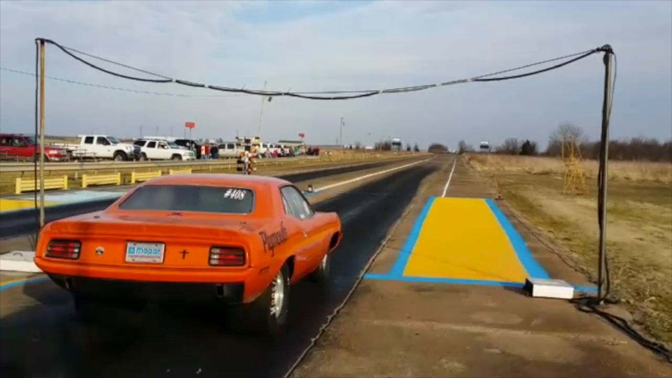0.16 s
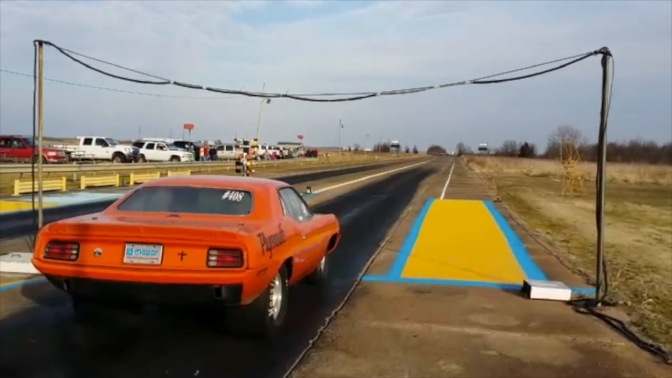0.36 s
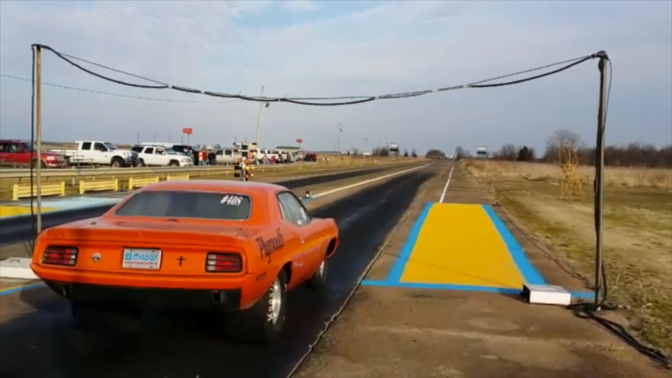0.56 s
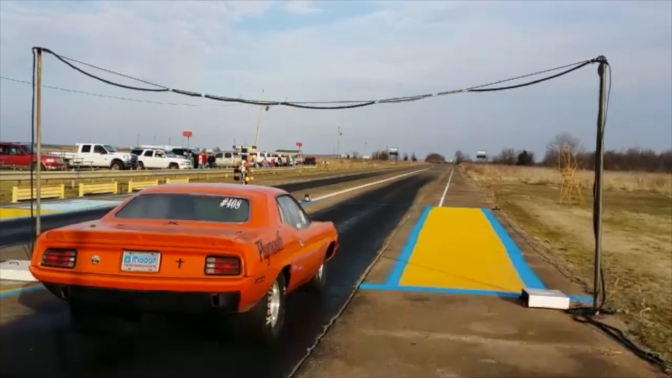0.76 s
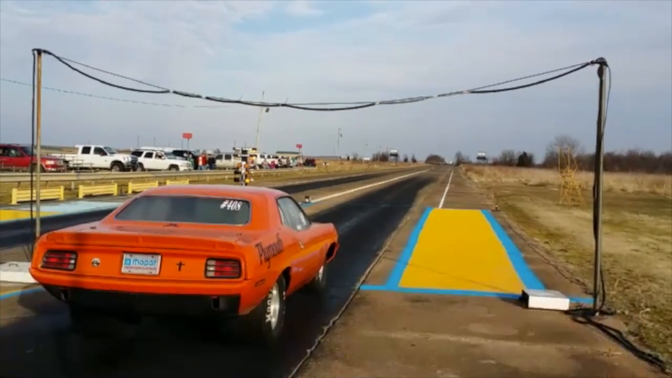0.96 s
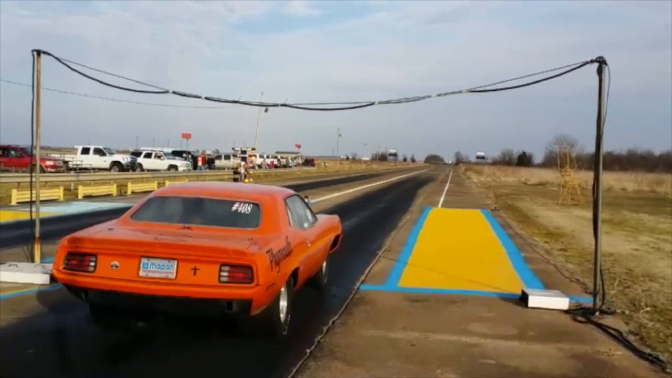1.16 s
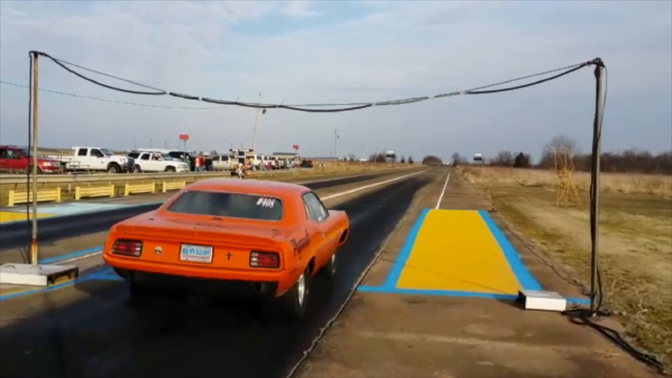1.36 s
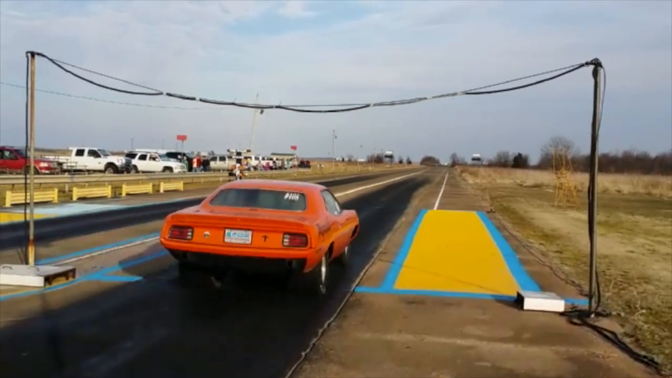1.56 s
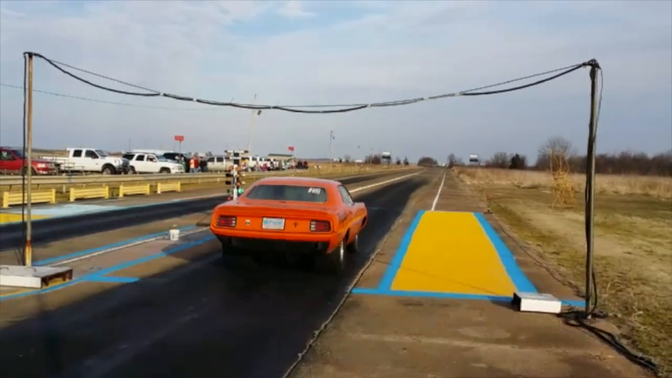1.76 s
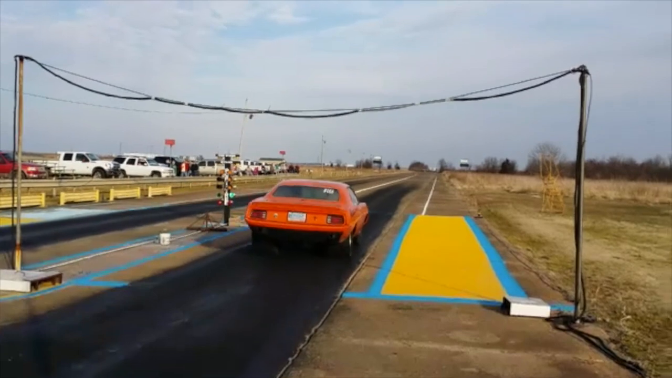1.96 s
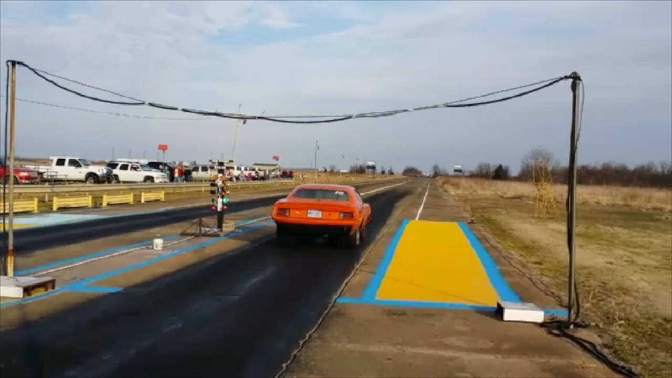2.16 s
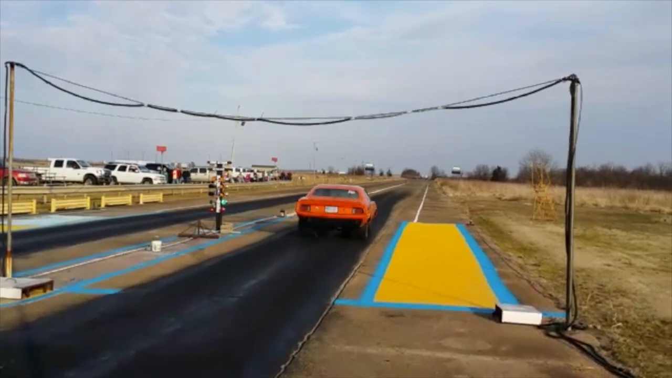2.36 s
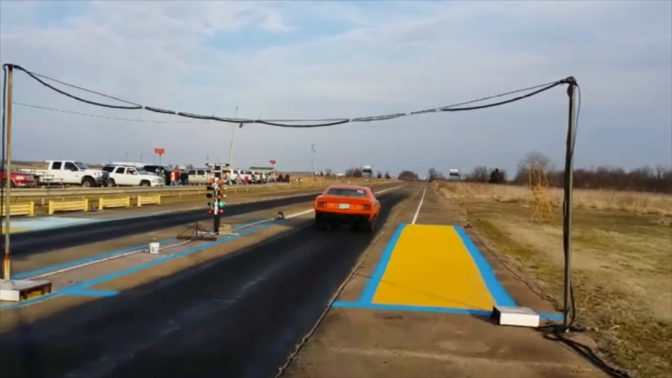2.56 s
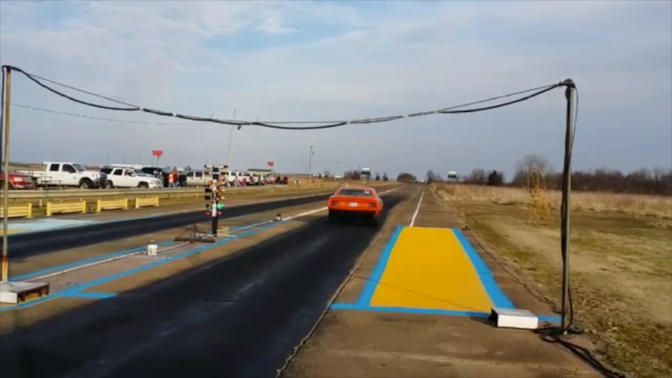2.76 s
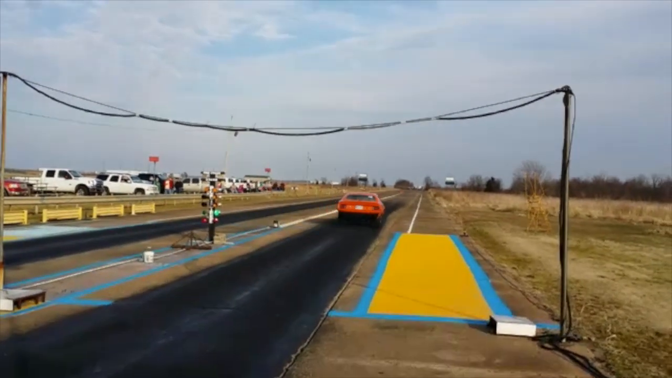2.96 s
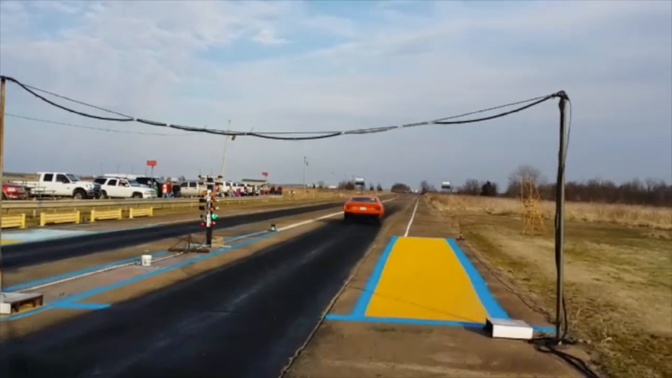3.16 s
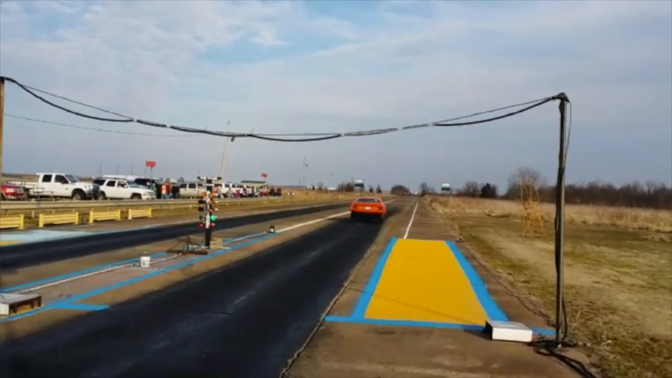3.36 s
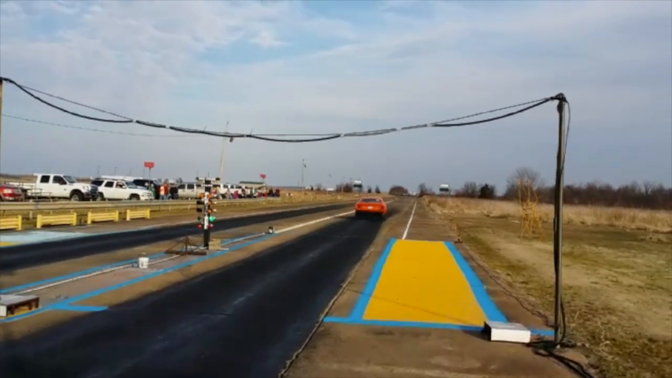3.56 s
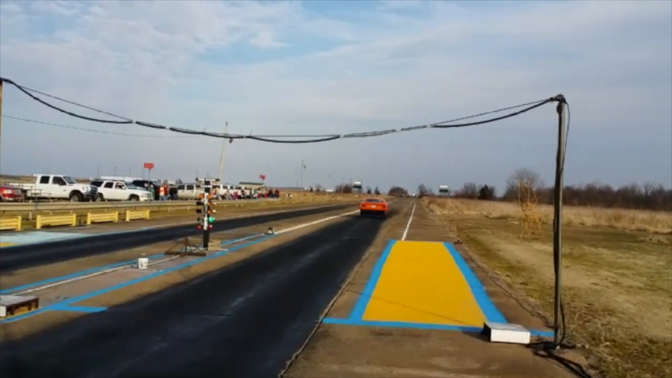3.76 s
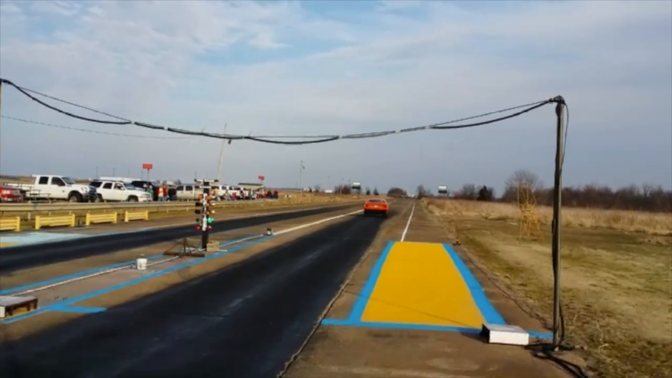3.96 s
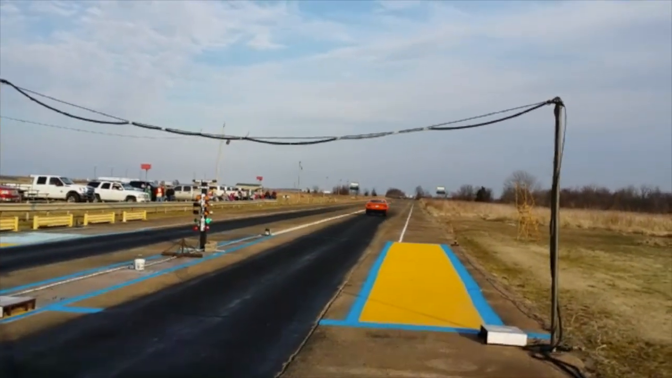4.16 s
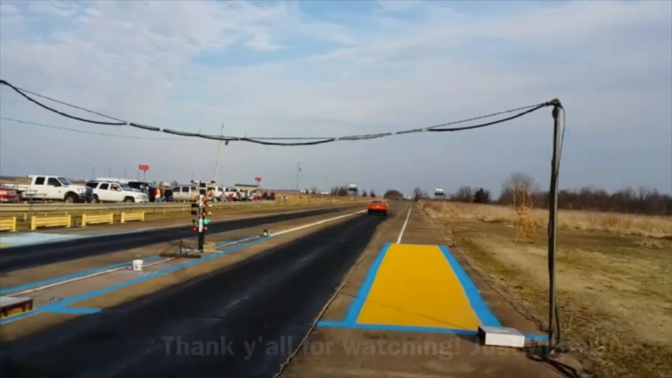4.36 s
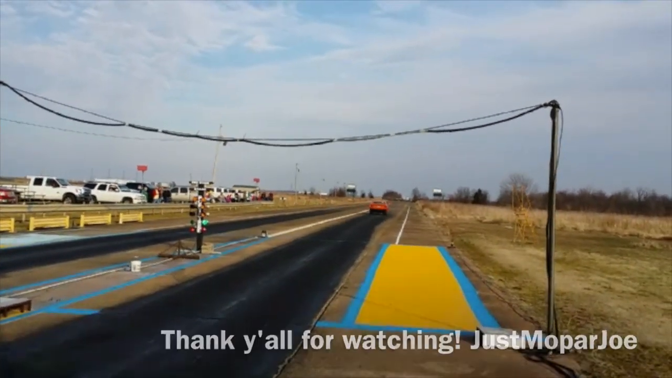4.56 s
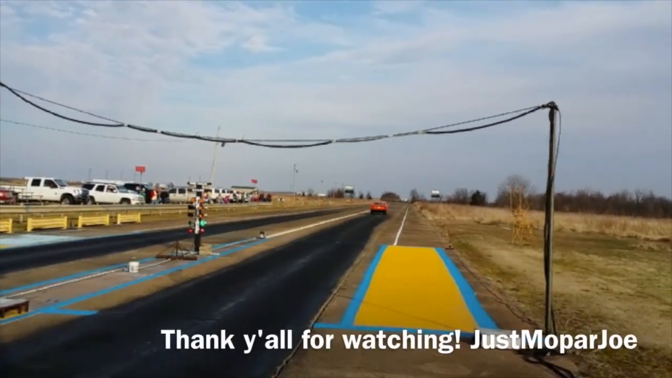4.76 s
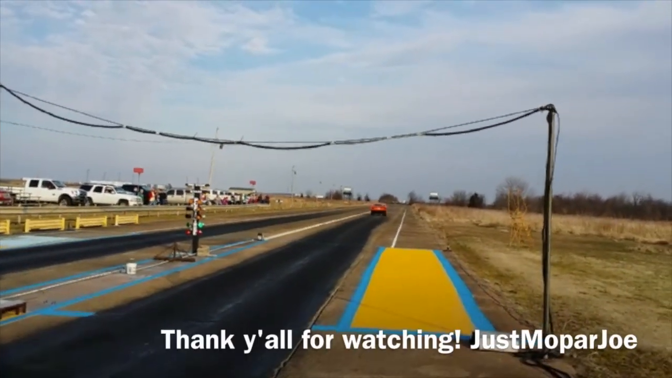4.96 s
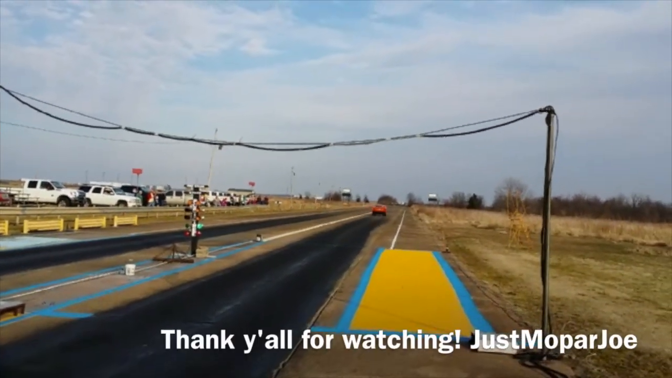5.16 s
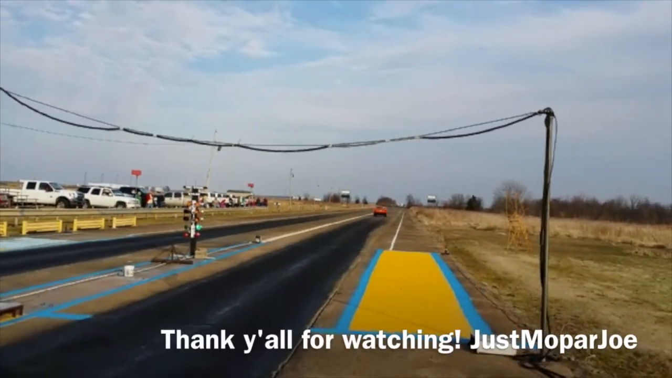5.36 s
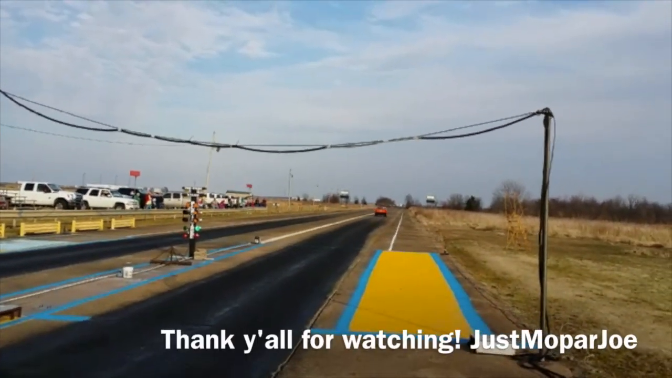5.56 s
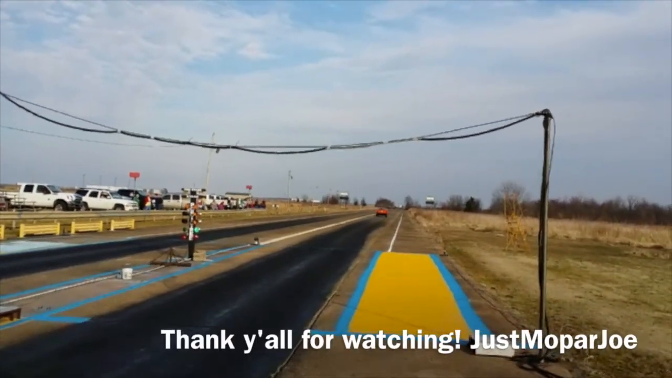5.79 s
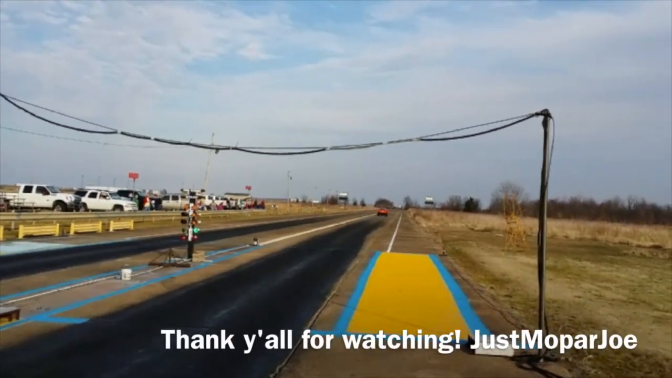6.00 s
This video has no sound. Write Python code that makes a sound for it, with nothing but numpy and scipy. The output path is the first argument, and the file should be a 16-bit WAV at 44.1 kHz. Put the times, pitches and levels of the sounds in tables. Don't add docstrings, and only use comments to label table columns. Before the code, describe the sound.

Loud open-pipe engine machine-guns at held revs, launches, climbs in pitch, drops with a shift, and drones off down the strip.

```python
import sys
import numpy as np
from scipy import signal
from scipy.io import wavfile
from scipy.ndimage import uniform_filter1d

SR = 44100
rng = np.random.default_rng(int(sys.argv[2]) if len(sys.argv) > 2 else 0)


def convert_level_to_amplitude(level_db):
    exponent = np.asarray(level_db, float) / 20
    return 10 ** exponent


def master_out(mix):
    frames = np.transpose(np.atleast_2d(mix))
    ceiling = np.clip(frames, -1, 1)
    pcm = np.round(ceiling * 32767).astype(np.int16)
    wavfile.write(sys.argv[1], SR, pcm)


N = 265923

# [t/s, cam cycles/Hz]
CAM_SPEED = [(0, 24.7), (.84, 24.7), (0.9, 26.1), (1.06, 30.9), (1.1, 32.2), (1.14, 33.4), (1.2, 34.6),
             (1.27, 34.8), (1.36, 34.3), (1.51, 34.1), (1.6, 33.5), (1.61, 33.6), (1.86, 38.1),
             (1.93, 38.2), (2.03, 37.3), (2.06, 37.5), (2.2, 39.3), (2.27, 40.0), (2.43, 41.1),
             (3.04, 44.4), (3.17, 45.5), (3.34, 46.6), (3.47, 47.3), (3.5, 46.2), (3.56, 42.9),
             (3.59, 41.5), (3.63, 40.2), (3.7, 38.8), (3.79, 38.7), (4.0, 38.8), (4.67, 39.6), (4.77, 39.8),
             (5.87, 41.2), (6.03, 41.1)]
# [t/s, exhaust note/dB, roar/dB, hiss/dB, roughness/0-1, odd orders of the near bank/dB]
ENGINE_LOAD = [(0.88, -21.5, -22, -37.5, 0.25, 1), (0.89, -26, -22, -41, 0.3, 6),
               (0.91, -23.5, -22, -32, 0.4, 0), (0.92, -24, -23, -33.5, 0.36, 1),
               (1.2, -28, -19, -30, 0.25, 5), (1.44, -20, -23.5, -32, 0.37, -4.5),
               (1.52, -29, -18.5, -29.5, 0.3, 5), (1.57, -20.5, -23, -31, 0.36, -1.5),
               (1.83, -21.5, -22.5, -32.5, 0.36, 0.5), (1.98, -23.5, -26, -32.5, 0.33, -3.5),
               (2.07, -24.5, -23.5, -34, 0, 6), (2.1, -20, -24.5, -30.5, 0.37, -2),
               (2.3, -22.5, -25, -36.5, 0.12, 0), (2.46, -23.5, -27.5, -34.5, 0.3, 1.5),
               (2.77, -23.5, -27.5, -36, 0.28, 2), (2.9, -22, -30.5, -39.5, 0.25, -1),
               (2.92, -23, -35, -40, 0.37, 2.5), (2.97, -25.5, -29.5, -36, 0.25, 6.5),
               (3.19, -21.5, -29.5, -39.5, 0.3, -4.5), (3.26, -25, -29, -40, 0.1, -6.5),
               (3.32, -24, -29.5, -32.5, 0.25, -0.5), (3.46, -23, -33, -39, 0.18, -4),
               (3.92, -27.5, -29.5, -37.5, 0.15, 3.5), (3.96, -25.5, -31, -43.5, 0.1, -1.5),
               (3.99, -27.5, -33, -37.5, 0.18, 4), (4.08, -26, -29.5, -39.5, 0.25, 0.5),
               (4.31, -25.5, -32.5, -40, 0.1, 2), (4.37, -27.5, -34, -41.5, 0.22, 2.5),
               (4.85, -27.5, -32, -44.5, 0.1, 2), (5.1, -27.5, -33, -42, 0.22, 3),
               (5.27, -27, -25, -45.5, 0.16, -1), (5.53, -28, -31.5, -42.5, 0.19, 4.5),
               (6.03, -27, -34.5, -46.5, 0.2, -1)]
# [order/cam cycles, level/dB]
HELD_ORDERS = [(2, -26), (3, -20), (4, -18), (5, -9), (6, -12), (7, -5), (8, 2), (9, -4), (10, -9), (11, 0),
               (12, -11), (13, -16), (14, -14)]
LEAVING_ORDERS = [(1, -42), (2, -29), (3, -24.5), (4, -32), (5, -5.5), (6, -11.5), (7, -7.5), (8, 2.5),
                  (9, -3), (10, -8), (11, -28), (12, -29), (13, -14), (14, -20.5), (15, -10), (16, -14),
                  (17, -29), (18, -12), (19, -7.5), (20, -13), (21, -19.5), (22, -22), (23, -9),
                  (24, -28.5), (25, -5), (26, -24.5)]
PULLING_ORDERS = [(1, -40), (2, -10), (3, -13.5), (4, -12.5), (5, -1), (6, 2), (7, -5), (8, 0.5),
                  (9, -12.5), (10, -13.5), (11, -24), (12, -10), (13, -13.5), (14, -7), (15, -5), (16, 0.5),
                  (17, -7.5), (18, -12.5), (19, -20.5), (20, -13.5), (21, -24.5), (22, -27), (23, -19.5),
                  (24, -18.5), (25, -31), (26, -22.5), (27, -19), (28, -16.5), (29, -23), (30, -25.5)]
FAR_ORDERS = [(1, -26.5), (2, -14.5), (3, -17.5), (4, -13), (5, -7), (6, 1), (7, -3), (8, 1), (9, -23.5),
              (10, -14.5), (11, -18), (12, -15.5), (13, -10.5), (14, -19), (15, -7), (16, -2.5), (17, -9.5),
              (18, -7), (19, -17), (20, -11), (21, -15.5), (22, -14.5), (23, -11), (24, -24), (25, -23.5),
              (26, -17), (27, -14), (28, -11), (29, -18.5), (30, -9), (31, -10.5), (32, -19.5)]
STAGE_TIMES = [
    .9,
    1.15,
    1.58,
    1.8,
    3.5,
    3.9,
]
STAGE_SPEEDS = [24.7, 34.3, 34.3, 43, 43, 40]
# [f/Hz, width/Hz, level/dB]
PIPE_RESONANCES = [(251, 120, 9.5), (658, 160, 11), (1269, 190, 13.5)]
# [t/s, peak level/dB (not used), depth of cut/dB, length of cut/s]
RELIGHTS = [(0.037, -18, 5.5, 0.053), (0.14, -32, 8, 0.029), (0.208, -3, 13, 0.019), (0.26, -15, 11, 0.012),
            (0.344, -15, 7.5, 0.011), (0.377, -5, 3.5, 0.029), (0.499, -18, 6.5, 0.066),
            (0.566, -20, 5, 0.045), (0.667, -14, 8.5, 0.039), (0.743, -2, 11, 0.02),
            (0.816, -16, 8.5, 0.065), (0.88, -12, 9, 0.018)]
# [t/s, peak level/dB, f/Hz]
AFTERFIRES = [(0.109, -14, 730), (0.298, -14, 721), (0.324, -10.5, 787), (0.379, -15, 874),
              (0.433, -13.5, 720), (0.5, -15, 830), (0.531, -12, 704), (0.652, -17.5, 710),
              (0.678, -18.5, 890), (0.743, -10, 800), (0.825, -10.5, 850), (0.855, -12.5, 678)]
# [t/s, gain/dB, length/s]
TREBLE_MOMENTS = [(0.186, 3.5, .02), (0.392, 9.5, 0.02), (0.576, 8.5, 0.031), (0.672, 6, 0.026),
                  (.97, 3, 0.015), (1.076, -2.5, 0.018), (1.223, 2.5, 0.015), (1.992, 8, 0.016),
                  (2.344, 2.5, 0.014), (2.708, 3.5, .02), (2.85, 6, 0.042), (3.318, 0, 0.021),
                  (4.004, 4, 0.014), (4.275, 2, .04)]
# [f/Hz, level/dB per Hz]
ROAR_NEAR = [(24, -56), (40, -36.5), (155, -8), (215, -13), (267, -15), (376, -23), (467, -12.5),
             (847, -13), (1090, -15), (2050, -18), (2600, -32.5), (3000, -25), (3900, -48), (6600, -120)]
ROAR_FAR = [(24, -48), (40, -56), (118, -18), (227, -1.5), (319, -9), (369, -8), (549, -22), (634, -2.5),
            (979, -16.5), (1090, -6), (1480, -15.5), (1880, -1), (3000, -43), (3900, -57), (6600, -120)]
# [f/Hz, level/dB per Hz]
LEFT_PORT = [(1500, -24.5), (2400, -1), (3000, -10), (3900, -9), (5000, -6.5), (6400, 0.5), (7100, -4.5),
             (7700, -22.5), (11000, -16.5), (13000, -12), (15000, -15.5)]
RIGHT_PORT = [(1500, -24), (2400, -11.5), (3300, -14), (4900, -5.5), (5900, -24), (6700, -10.5),
              (7800, -0.5), (8500, -9), (9200, -11.5), (13000, -9), (15000, -17.5)]
# [f/Hz, likeness/0-1]
PORT_LIKENESS = [(60, 1), (130, 0.37), (290, 0.99), (630, 0.48), (1380, 0.31), (3000, .14), (6600, 0.09)]
# [f/Hz, level/dB]
PORT_LEAN = [(60, 0), (800, -0.4), (1300, 0.5), (2500, 1.5)]
# [t/s, step against treble level/dB]
GRAIN_OVER_TIME = [(0, 7), (.7, 5.5), (.9, 8), (2.5, 9), (2.9, 4), (4.2, 3), (4.6, 6.5), (5.4, 6.5),
                   (6.03, 7.5)]
# [f/Hz, step/dB]
GRAIN_BY_PITCH = [(1500, -16.5), (2300, -2.5), (4000, 4), (6000, -0.5), (7200, -2.5), (8200, -2.5),
                  (8800, 2.5), (9500, 12.5), (15000, 10)]


def evened(x):
    return x / np.sqrt(np.mean(abs(x) ** 2) + 1e-20)


def read(points, hz):
    f, value = np.transpose(points)
    return np.interp(np.log(hz + 1), np.log(f + 1), value)


def curve(rows, t, column=1):
    rows = np.array(rows)
    return np.interp(t, rows[:, 0], rows[:, column])


def port_pair(shape, likeness):
    a, b, c, d = rng.standard_normal((4, *shape))
    likeness = np.clip(likeness, 0, 1)
    left, other = a + 1j * b, c + 1j * d
    return np.array([left, likeness * left + np.sqrt(1 - likeness ** 2) * other])


def treble_moments_db(t):
    return sum(db * np.exp(-.5 * ((t - s) / length) ** 2) for s, db, length in TREBLE_MOMENTS)


def cuts_db(t):
    out = np.zeros(len(t))
    for s, _, depth_db, length in RELIGHTS:
        sag = np.exp(np.minimum(t - s, 0) / length)
        snap = np.exp(-np.maximum(t - s, 0) / 0.0013)
        out -= depth_db * sag * snap
    return out


def pattern_db(order, t):
    def level(table):
        k, db = np.transpose(table)
        beyond_db = -0.69 * max(order - k[-1], 0)
        total_db = 10 * np.log10(np.sum(convert_level_to_amplitude(db[:11]) ** 2))
        return np.interp(order, k, db) + beyond_db - total_db

    def pipe_db(speed):
        return sum(db / (1 + (2 * (order * speed - hz) / width) ** 2) for hz, width, db in PIPE_RESONANCES)

    held, leaving, pulling, far = map(level, (HELD_ORDERS, LEAVING_ORDERS, PULLING_ORDERS, FAR_ORDERS))
    base_db = np.interp(t, STAGE_TIMES, [held, leaving, leaving, pulling, pulling, far])
    return base_db + pipe_db(curve(CAM_SPEED, t)) - pipe_db(np.interp(t, STAGE_TIMES, STAGE_SPEEDS))


def exhaust(t, turns, count=42):
    hop = 128
    slow, out = t[::hop], np.zeros((2, N))
    rough = np.where(slow < .9, .5, np.clip(curve(ENGINE_LOAD, slow, column=4), 0, 1))
    bank_db = curve(ENGINE_LOAD, slow, column=5)
    turn = np.exp(2j * np.pi * turns)
    spin, scatter = turn, 2 * np.pi * rng.random(count)
    for k in range(2, count):
        spin = spin * turn
        waver_hz = 5.5 + .3 * k
        waver = port_pair(slow.shape, 1.1 * read(PORT_LIKENESS, 17.0 * k))
        waver = evened(signal.lfilter([1], [1, -np.exp(-2 * np.pi * waver_hz * hop / SR)], waver))
        drift_db = 1.8 * evened(uniform_filter1d(rng.standard_normal(len(slow)), size=200))
        share = np.clip(rough * (.6 + k / 23.0), 0, .97)
        level = convert_level_to_amplitude(pattern_db(k, slow) + bank_db * (k % 2) + drift_db * (k > 8))
        size = level * (np.sqrt(1 - share ** 2) + share * waver)
        lag = 1.8 * (k < 5) - .8 * (k % 2) + (k > 8) * scatter[k]
        for c, side in enumerate((.5, -.5)):
            ahead = side * 38. * k * 2 * np.pi * .0001
            gain = np.sqrt(2) * convert_level_to_amplitude(side * read(PORT_LEAN, 47.0 * k)) * np.exp(1j * (lag + ahead))
            out[c] += (np.interp(t, slow, gain * size[c]) * spin).real
    held_db = np.interp(t, STAGE_TIMES[:2], [3., 0])
    return out * convert_level_to_amplitude(curve(ENGINE_LOAD, t) + cuts_db(t) + held_db)


def rush(near_db, far_db, likeness, patchy_db):
    frames, hz = N // 128 + 5, np.fft.rfftfreq(512, 1 / SR)
    gone = np.clip((np.arange(frames) * 128 / SR - 1.7) / 2.2, 0, 1)
    patches = uniform_filter1d(rng.standard_normal((257, frames)), size=6, axis=0)
    patches = evened(uniform_filter1d(patches, size=20, axis=1))
    colour_db = near_db(hz)[..., None] * (1 - gone) + far_db(hz)[..., None] * gone
    z = port_pair((257, frames), likeness(hz)[:, None]) * convert_level_to_amplitude(colour_db + patchy_db * patches)
    x = signal.istft(z, nperseg=512, noverlap=384)[1][:, :N]
    return x / np.sqrt(uniform_filter1d(x.mean(0) ** 2, size=22050))


def roar(t, turns):
    def colour(points):
        return lambda hz: read(points, hz) + np.outer([.5, -.5], read(PORT_LEAN, hz))

    gas = rush(colour(ROAR_NEAR), colour(ROAR_FAR), lambda hz: read(PORT_LIKENESS, hz), patchy_db=2.0)
    cycle = 2 * np.pi * turns
    beat = 1 + 0.16 * np.cos(cycle + 1.07) + 0.05 * np.cos(2 * cycle + 0.6)
    return gas * beat * convert_level_to_amplitude(curve(ENGINE_LOAD, t, column=2) - 4.0 + .5 * cuts_db(t))


def hiss(t, turns):
    def near(hz):
        return np.array([read(LEFT_PORT, hz), read(RIGHT_PORT, hz)])

    def far(hz):
        return near(hz) - 1.1e-3 * np.minimum(hz, 9000)

    fizz = rush(near, far, lambda hz: 0.12 + 0 * hz, patchy_db=3.0)
    cycle = 2 * np.pi * turns
    beat = 1 + 0.067 * np.cos(cycle + 2.1) + 0.05 * np.cos(2 * cycle + 0.23) + 0.05 * np.cos(4 * cycle)
    level_db = curve(ENGINE_LOAD, t, column=3) + 2.0
    return fizz * beat * convert_level_to_amplitude(level_db + .5 * treble_moments_db(t) - 0.9 * cuts_db(t))


def cracks():
    out, u = np.zeros(N), np.arange(900) / SR
    rise = u / .0018
    for s, db, hz in AFTERFIRES:
        ring = convert_level_to_amplitude(db - 3.) * np.sin(2 * np.pi * hz * u) * rise * np.exp(1 - rise)
        out[round(s * SR):][:len(u)] += ring
    return out


def wind():
    low = signal.butter(2, 111, fs=SR, output="sos")
    lumps = signal.sosfilt(low, rng.standard_normal((2, N)))
    return convert_level_to_amplitude(-46.5) * evened(lumps)


def scene():
    t = np.arange(N) / SR
    turns = np.cumsum(curve(CAM_SPEED, t)) / SR
    return exhaust(t, turns) + roar(t, turns) + hiss(t, turns) + cracks() + wind()


def grain_treble(x, start, finer_db, size=1024):
    n, k = np.arange(2 * size), np.arange(size) + .5
    basis = np.cos(np.pi / size * np.outer(n + .5 + size / 2, k)) * np.sqrt(2 / size)
    basis *= signal.windows.kaiser_bessel_derived(2 * size, 4 * np.pi)[:, None]
    frames = N // size + 2
    padded = np.pad(x, ((0, 0), (2 * size - start, 3 * size)))
    at = np.arange(frames)[:, None] * size + n
    lines = padded[:, at] @ basis
    hz = k * SR / 2 / size
    t = (at[:, size] - 2 * size + start) / SR
    treble = np.sqrt(uniform_filter1d((lines[:, :, 120:400] ** 2).mean((0, 2)), size=15))
    by_band = np.repeat(rng.exponential(1, (2, frames, size // 16)), 16, axis=2)
    luck_db = 2.0 * rng.standard_normal((2, frames, 1)) - 2.2 * by_band
    frame_step = treble * convert_level_to_amplitude(curve(GRAIN_OVER_TIME, t) - 0.9 * treble_moments_db(t))
    step = frame_step[:, None] * convert_level_to_amplitude(read(GRAIN_BY_PITCH, hz) + luck_db - finer_db)
    lines = np.sign(lines) * step * np.floor(abs(lines) / step + 0.32)
    halves = (lines @ basis.T).reshape(2, frames, 2, size)
    out = halves[:, 1:, 0] + halves[:, :-1, 1]
    return out.reshape(2, -1)[:, size - start:][:, :N]


def band_limit(x):
    return signal.sosfilt(signal.butter(12, 15010, fs=SR, output="sos"), x)


def record(dry):
    x = signal.sosfilt(signal.butter(2, 68., "high", fs=SR, output="sos"), dry)
    power_db = 10 * np.log10(uniform_filter1d((x ** 2).mean(0), size=300) + 1e-9)
    over_db = power_db - uniform_filter1d(power_db, size=9000)
    x = x / convert_level_to_amplitude(.3 * uniform_filter1d(over_db, size=100))
    ceiling = 0.78
    x = ceiling * np.tanh(x / ceiling)
    x = grain_treble(x, start=300, finer_db=0)
    mix = grain_treble(x, start=735, finer_db=17)
    return band_limit(mix)


dry = scene()
out = record(dry)
master_out(out)
```